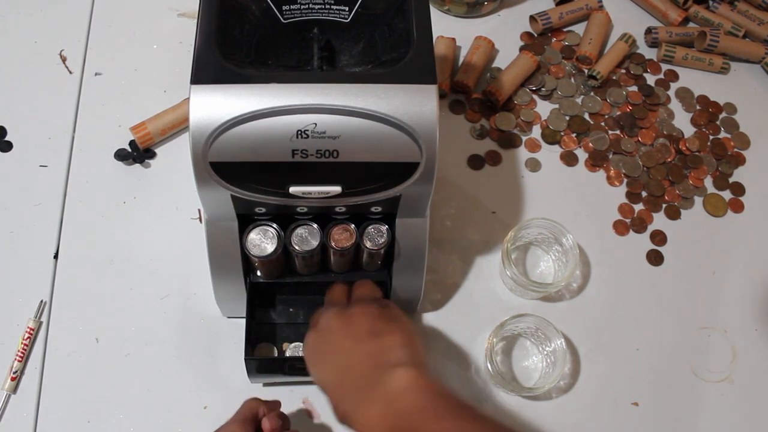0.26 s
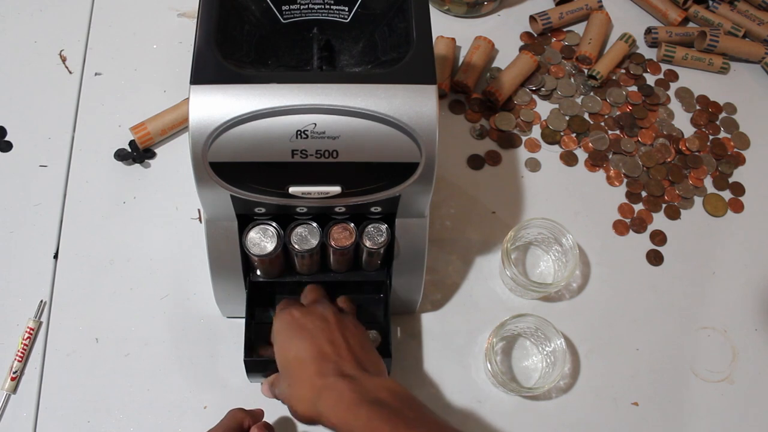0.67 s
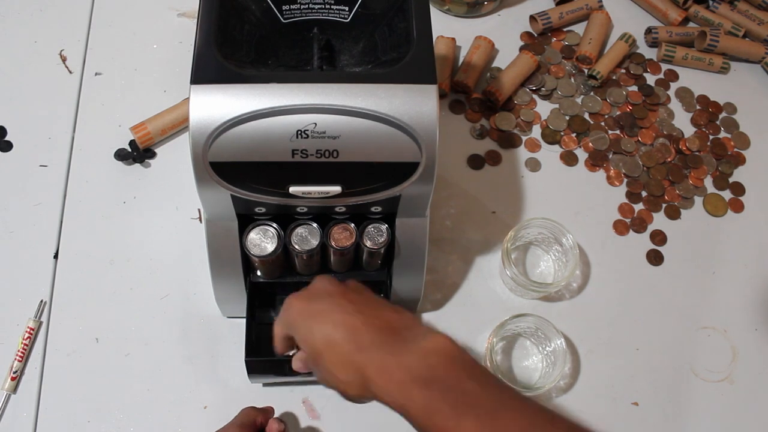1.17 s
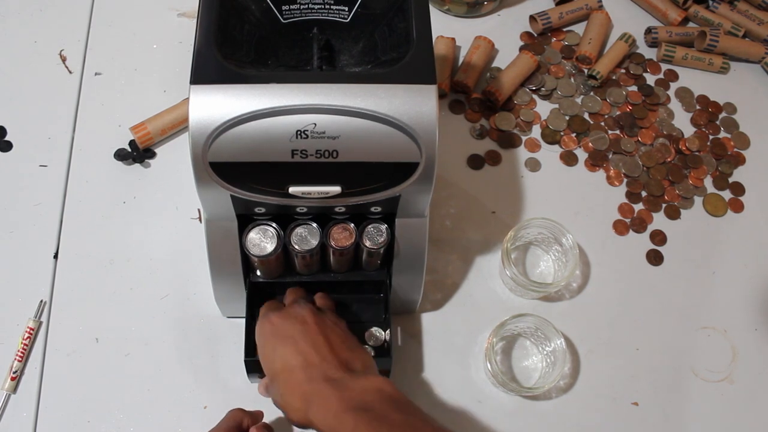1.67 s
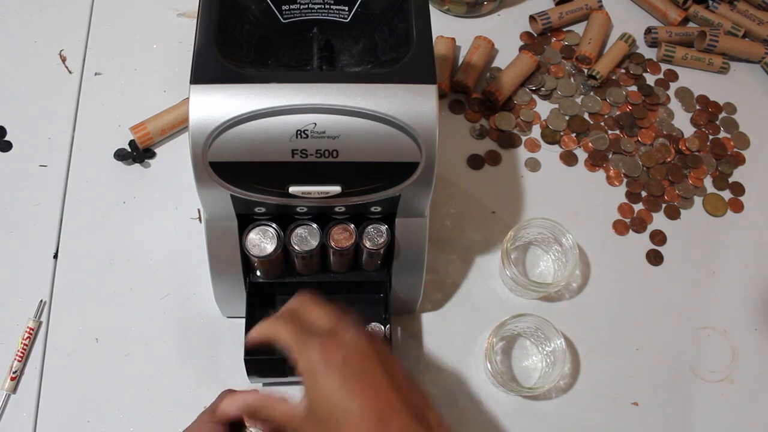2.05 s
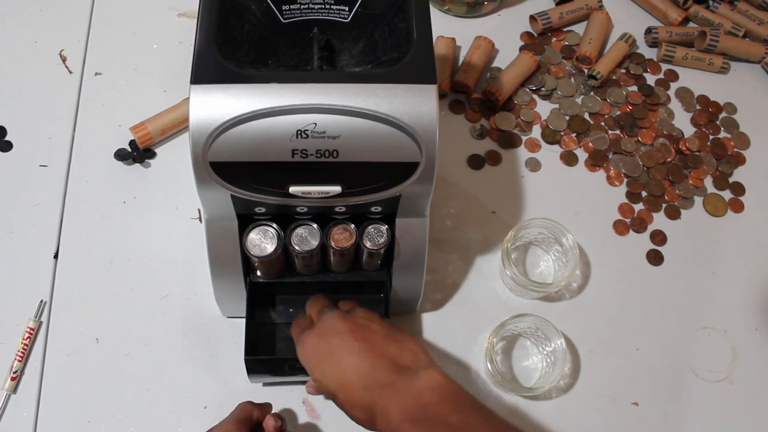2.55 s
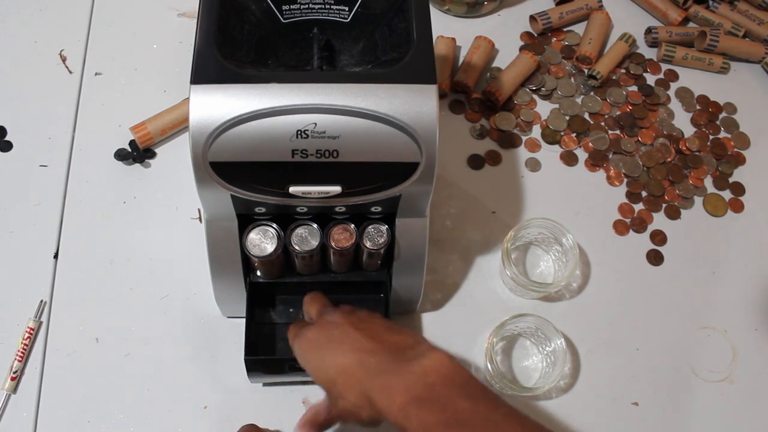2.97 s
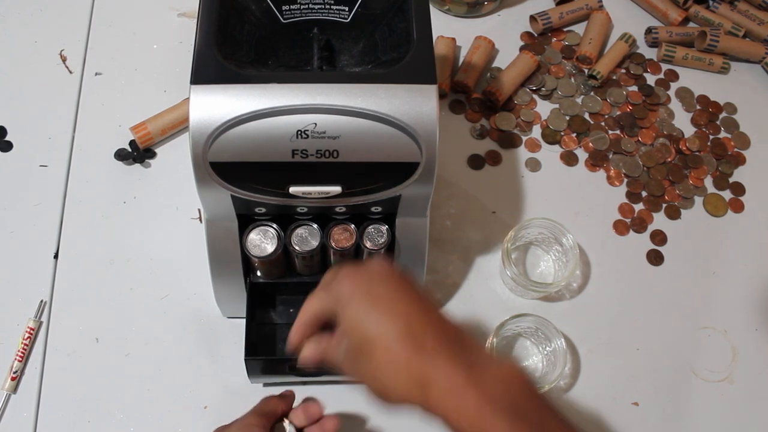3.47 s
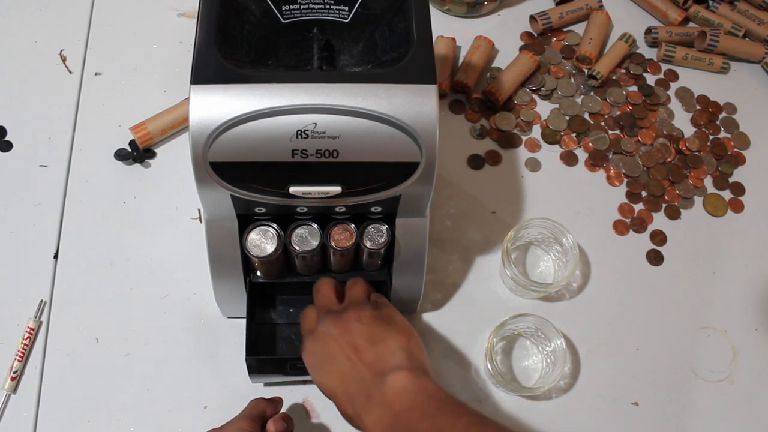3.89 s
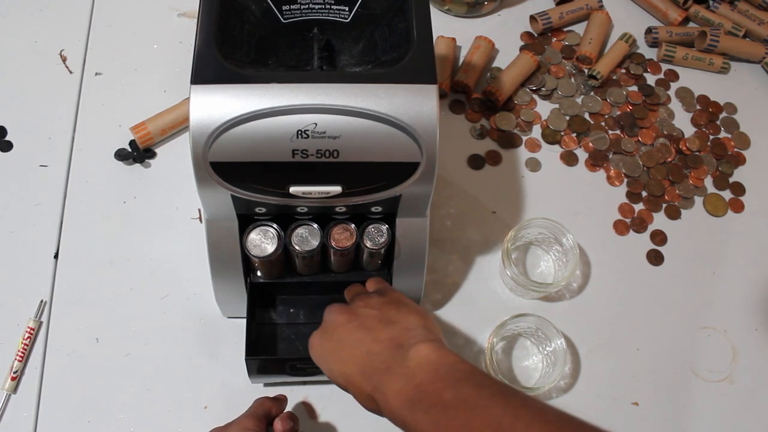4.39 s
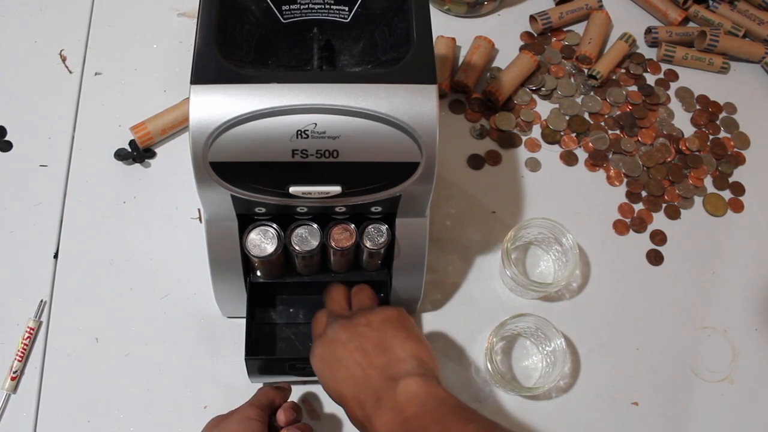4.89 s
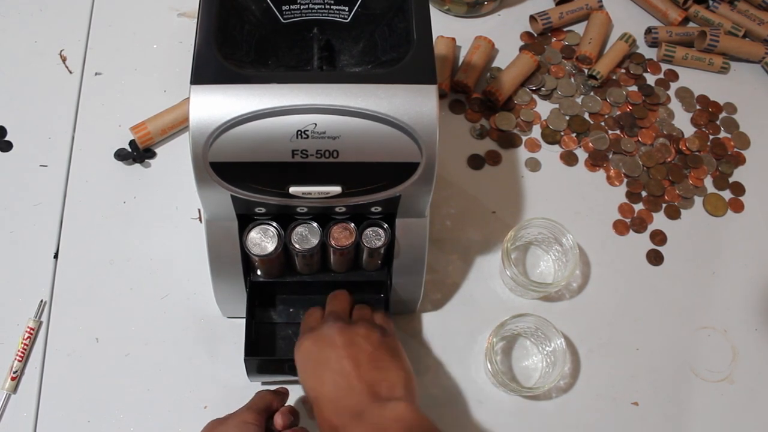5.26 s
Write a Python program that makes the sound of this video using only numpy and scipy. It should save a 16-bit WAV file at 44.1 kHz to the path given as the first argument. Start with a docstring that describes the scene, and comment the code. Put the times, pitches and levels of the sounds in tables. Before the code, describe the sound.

Close, dry rattling of coins being scooped from a plastic tray: irregular scrapes, hard knocks, dull thuds and a few piercing metallic clinks.

```python
"""Fingers scrape coins along a small plastic tray over faint room noise, then a loud clink and knocks break in.
A hand scoops up loose coins: each touch is a noise-like swarm of contacts that excites the modes of the tray,
ticks in the treble and thuds through the table. Coins dropped into the other palm clink: a crack sets narrow
modes ringing, which skin or another coin damps. Soft low bumps and a weak, dull echo complete the scene."""
import sys
import numpy as np
from scipy import signal
from scipy.fft import rfft, irfft
from scipy.io import wavfile
from scipy.ndimage import uniform_filter1d

SR = 44100
rng = np.random.default_rng(int(sys.argv[2]) if len(sys.argv) > 2 else 0)


def transcribe(u):
    """Save the signal u as a 16-bit wav file named by the first command-line argument.

    u: samples, shape (n,) or (channels, n), limited to [-1, 1]; the rate is SR.
    q: integer samples, one column per channel.
    """
    v = np.clip(np.atleast_2d(u).T, -1, 1)
    q = np.round(v * 32767).astype(np.int16)
    wavfile.write(sys.argv[1], SR, q)


N = 243873  # length of the scene [samples]
GRAIN, LEAD = 16384, 6144  # length of one event and position of its peak [samples]
EVENT_MS = (np.arange(GRAIN) - LEAD) * 1000 / SR  # time from the peak
EVENT_HZ = np.fft.rfftfreq(GRAIN, 1 / SR)

# sets of three coin modes, one row per way of ringing; some rows share a coin:
# (mode 1 [Hz], mode 2 [Hz], mode 3 [Hz])
COIN_MODES = [(9405, 13270, 15200), (11265, 11828, 15190), (9310, 12330, 13920), (9500, 11330, 13240),
              (8807, 12750, 14850), (9400, 11850, 15570), (9405, 13270, 15190), (9500, 12770, 13900)]
COIN_WIDTH_HZ = 38  # half-power bandwidth of a freely ringing coin


def undb(db):
    """Decibel law: amplitude ratio of a level in dB."""
    return 10 ** (np.asarray(db) / 20)


def resonance(f, hz, width_hz):
    """Damped oscillator: response of one mode, gain 1 at its centre."""
    return 1j * f * width_hz / (hz ** 2 - f ** 2 + 1j * f * width_hz)


def through(x, response):
    """Linear filtering: multiply the spectrum of each row by its frequency response."""
    return irfft(rfft(x) * response, x.shape[-1])


def root_energy(rows):
    """Signal energy: square root of the summed squares of each row."""
    return np.sqrt((rows ** 2).sum(axis=-1, keepdims=True))


def fits(shape):
    """Intermittency: random levels held a few milliseconds, with softened steps."""
    hold = SR // 300
    levels = rng.standard_normal((shape[0], shape[1] // hold + 1))
    held = np.repeat(levels, hold, axis=1)[:, :shape[1]]
    return uniform_filter1d(held, hold // 2, axis=1)


def contacts(shape, spread_db, fits_db):
    """Random excitation: swarms of tiny uneven contacts that come in fits, with scattered hard clicks."""
    lone = rng.random(shape) < 250 / SR  # 250 a second on average
    level_db = spread_db * rng.exponential(size=shape) + fits_db * fits(shape) + 10.5 * lone
    return rng.standard_normal(shape) * undb(level_db)


def envelope(swell_ms, fade_ms):
    """Exponential growth and decay: one row per event, peaking at LEAD."""
    constant_ms = np.where(EVENT_MS < 0, swell_ms[:, None], fade_ms[:, None])
    return np.exp(-np.abs(EVENT_MS) / np.clip(constant_ms, .05, 45))


def place(times, rows):
    """Superposition: add each row to the time line with its LEAD sample at the given time [s]."""
    out = np.zeros(N + 2 * GRAIN)
    for s, row in zip(times, rows):
        start = int(s * SR) + GRAIN - LEAD
        out[start:start + GRAIN] += row
    return out[GRAIN:GRAIN + N]


def room():
    """Stationary coloured noise: the faint noise of the room and the microphone."""
    # noise spectrum: (frequency [Hz], relative level per hertz [dB])
    noise_spectrum = [(40, -8.5), (200, -4), (1000, -3.5), (5000, -10.5), (16000, -24)]
    hz, db = np.transpose(noise_spectrum)
    f = np.fft.rfftfreq(N, 1 / SR)
    spectrum_db = np.interp(np.log(f + 1), np.log(hz), db)
    noise = through(rng.standard_normal(N), undb(spectrum_db))
    return undb(-54.5) * noise / noise.std()


def reverberation(dry):
    """Diffuse decay: table and walls answer with dull noise that falls 60 dB in 0.14 s."""
    t = np.arange(SR // 4) / SR
    dull_noise = uniform_filter1d(rng.standard_normal(len(t)), size=4)
    echo = dull_noise * undb(-42.0 - 60 * t / 0.14)
    return signal.fftconvolve(dry, echo)[:N]


def bumps():
    """Transient low oscillation: the heel of the hand or the tray pushes the table for a few soft cycles."""
    # soft bumps: (start [s], peak level before smoothing [dB], pitch [Hz])
    table_bumps = [(0.329, -37, 197), (0.519, -39, 147), (1.149, -33, 161), (1.462, -35, 145),
                   (1.646, -31, 210), (1.676, -30.5, 134), (1.768, -34, 176), (2.292, -34.5, 272),
                   (2.93, -31, 134), (3.661, -26.5, 230), (4.687, -26, 165), (4.95, -32, 155),
                   (5.092, -32, 280), (5.296, -36, 152)]
    swell_ms, fade_ms = 2.77, 11.6  # before smoothing
    s, db, hz = np.transpose(table_bumps)
    phase = rng.random((len(s), 1))  # in cycles
    cycles = np.sin(2 * np.pi * (hz[:, None] * EVENT_MS / 1000 + phase))
    shape = uniform_filter1d(envelope(swell_ms + 0 * s, fade_ms + 0 * s), size=200, axis=1)
    return place(s + swell_ms / 1000, undb(db)[:, None] * shape * cycles)


def handful(gain_db):
    """Modal superposition: all coin modes, each damped by neighbours; one row of gains [dB] per event."""
    return sum(undb(gain_db[:, k, None]) * resonance(EVENT_HZ, hz, 4 * COIN_WIDTH_HZ)
               for k, hz in enumerate(np.ravel(COIN_MODES)))


def tray(tilt_db, deep_db):
    """Modal response: the struck spot weights each mode at random; the plastic is dull in the treble."""
    # tray modes: (frequency [Hz], bandwidth [Hz], relative level [dB])
    tray_modes = [(854, 130, -8.5), (1077, 100, -5.5), (1259, 176, 3), (1586, 217, 4), (1930, 576, 0),
                  (2428, 326, 1), (2930, 343, -5), (3567, 395, -2), (4670, 2870, -5.5)]
    spot_db = 3.89 * rng.standard_normal((len(tilt_db), len(tray_modes)))
    # a blow that shakes the table also drums the tray floor, its lowest mode
    spot_db[:, 0] = 0.6 * spot_db[:, 0] + deep_db
    modes = 0
    for k, (hz, width_hz, mode_db) in enumerate(tray_modes):
        tilted_db = tilt_db[:, None] * np.log2(hz / 1600)  # the tilt is in dB per octave
        gain = undb(mode_db + spot_db[:, k, None] + tilted_db)
        modes = modes + (-1) ** k * gain * resonance(EVENT_HZ, hz, width_hz)
    return modes / (1 + 1j * EVENT_HZ / 9000) ** 4


def strokes():
    """Contact force: a thud grows with the weight of the hand, with level, length and a soft contact."""
    # coins and nails knock the tray, a sudden start and a fade:
    # (time [s], body level [dB], fade constant [ms], tick level against body [dB])
    knocks = [(0.24, -31, 1.5, 22.5), (0.306, -40, 12, -7), (0.478, -29, 12, -9), (0.51, -21, 22, -13),
              (0.554, -15.5, 5, -6), (0.6638, -28, 32, -13), (0.6675, -11, 2, -7), (0.741, -23, 27, -17),
              (0.796, -25.5, 8.1, -17), (0.8474, -5, 2.7, -12), (0.847, -21.5, 16, -7),
              (0.931, -35, 17, -9), (0.969, -34.5, 10, -13), (1.0109, -14.5, 6.3, -6), (1.053, -32, 8.8, 0),
              (1.14, -22.5, 6, -3), (1.285, -25.5, 20, -26), (1.298, -12.5, 3, -6.5), (1.459, -29, 21, -43),
              (1.516, -3, 4.3, -9), (1.5395, -27, 0.94, -37), (1.65, -29, 4, -16), (1.673, -10, 10, -26.5),
              (1.725, -23.5, 13.6, -31), (1.894, -16, 5.3, -10), (1.9231, -7.5, 4.1, -5.5),
              (2.1675, -8.5, 7.3, -19.5), (2.206, -9, 3.2, -20), (2.2994, -7.5, 5.1, -9.5),
              (2.3085, -12, 2.2, -2), (2.357, -21, 18, -9), (2.506, -8, 1.75, -11),
              (2.566, -11.5, 2.5, -11), (2.568, -19.5, 44, -7), (2.682, -21, 19.5, -8),
              (2.9341, -17, 4.1, -26), (3.069, -19.5, 0.96, -33), (3.125, -31.5, 6.3, -15),
              (3.18, -26, 3.1, -41), (3.277, -7, 1.9, -7.5), (3.3012, -7, 1.5, -6),
              (3.332, -31.5, 7.4, -22), (3.403, -32, 52, -7), (3.6621, -15, 12, -48),
              (3.686, -15, 5.8, -16), (3.701, -21, 7.3, -17), (3.7727, -16.5, 22, -10.5),
              (3.815, -21, 5.6, -14), (3.8539, -15, 8, -21.5), (3.915, -11.5, 8.5, -7.5),
              (3.94, -23.5, 18.6, -45), (4.0866, -21, 4.9, -9.5), (4.155, -9.5, 14.8, -12.5),
              (4.2112, -15.5, 3.4, -2.5), (4.229, -15, 3.3, -9), (4.3311, -25.5, 8.1, -17),
              (4.4196, -14.5, 3.5, 0), (4.4435, -24, 22, -9), (4.671, -17.5, 8.3, -10),
              (4.706, -11.5, 3.7, -25), (4.7292, -19, 10, -19), (4.78, -13, 11.7, -28),
              (4.928, -15, 2.3, -58), (4.945, -10.5, 12.2, -18), (4.979, -10, 4.9, -8.5),
              (5.055, -27.5, 53, -21), (5.088, -22.5, 31, -40.5), (5.127, -15, 22, -14),
              (5.175, -17.5, 10.4, -5), (5.228, -29, 4.3, -36), (5.2846, -17.5, 8.3, -43),
              (5.326, -17, 8.4, -26.5), (5.4242, -11, 2.2, -6.5), (5.454, -16, 3.6, -18)]
    # fingers scrape coins along the tray, building up to a peak; swells over 45 ms are held at 45 ms:
    # (time of the peak [s], body level [dB], swell constant [ms], tick level against body [dB])
    scrapes = [(0.0226, -29, 16, -10.5), (0.0977, -39.5, 16, -13), (0.1456, -21, 5.6, -23.5),
               (0.3367, -26, 7, -22), (0.41, -10, 9.3, -8.5), (0.531, -13.5, 7.6, -13),
               (0.565, -19.5, 15, -7), (0.5925, -21.5, 26, -10), (0.6312, -17, 7.8, -10.5),
               (0.697, -18.5, 6.1, -12), (0.8736, -15, 6.5, -12.5), (0.9942, -25, 15, -26),
               (1.0645, -22.5, 5.5, -17), (1.104, -30.5, 27, -11.5), (1.1526, -15.5, 5.2, -13),
               (1.224, -24.5, 21, -6), (1.2434, -18.5, 3, -2), (1.563, -25.5, 23.4, -31),
               (1.576, -25.5, 4.9, -12), (1.6942, -24.5, 33, -33.5), (1.813, -20, 13, -13),
               (1.8281, -10, 5.9, -7.5), (2.011, -35, 13.6, -21), (2.3311, -24.5, 23.6, -10.5),
               (2.4074, -19.5, 8.7, -7), (2.46, -38, 31, -14), (2.472, -14.5, 2.3, -61),
               (2.5812, -11, 4.9, -7), (2.7046, -9.5, 3.8, -2), (2.669, -29, 27, -24),
               (2.7643, -29, 3, -10), (2.9927, -11.5, 2.76, -39), (3.01, -27.5, 21, -9.5),
               (3.092, -18, 7.2, -15), (3.203, -27.5, 16, -37.5), (3.2969, -15, 6.4, -6.5),
               (3.414, -12.5, 8.3, -12.5), (3.4948, -24, 7.6, -15), (3.6777, -10.5, 5.7, -12.5),
               (3.766, -26.5, 5.3, -13), (3.7794, -12, 5.6, -14), (3.8034, -22.5, 7.8, -3.5),
               (4.0075, -21.5, 8.3, -5), (4.2883, -40.5, 16, -26), (4.3592, -15.5, 3.4, -14.5),
               (4.4098, -11, 2.45, -20), (4.4184, -23, 11.3, -11), (4.536, -41, 9.1, -5),
               (4.6917, -11, 3.2, -20.5), (4.7056, -27, 14.6, -15), (4.7518, -20.5, 3.4, -36),
               (4.7983, -14.5, 6.8, -20), (4.84, -39.5, 60, -19), (4.9615, -36.5, 93, -11),
               (5.022, -20, 5.7, -17), (5.1429, -5, 1.4, -28), (5.264, -28, 4.5, -5),
               (5.3022, -20.5, 14, -16), (5.3815, -28.5, 9.1, -20)]
    # how heavily the hand leans on the tray: (time [s], thud level before adjustment [dB])
    hand_weight = [(0.0, -44.5), (0.33, -26.5), (0.98, -43.5), (1.14, -25), (1.4, -50), (1.52, -24),
                   (1.6, -49), (1.75, -29.5), (2.06, -66), (2.17, -25), (2.3, -32), (2.9, -44),
                   (2.94, -17.5), (3.05, -42), (3.6, -21.5), (3.67, -30), (3.73, -35.5), (4.6, -35),
                   (4.7, -24), (4.74, -38), (5.1, -29.5), (5.53, -40)]
    knock_s, knock_db, knock_fade_ms, knock_tick_db = np.transpose(knocks)
    scrape_s, scrape_db, scrape_swell_ms, scrape_tick_db = np.transpose(scrapes)
    s, db = np.r_[knock_s, scrape_s], np.r_[knock_db, scrape_db]
    tick_db = np.r_[knock_tick_db, scrape_tick_db]
    swell_ms = np.r_[0.45 + 0 * knock_fade_ms, scrape_swell_ms]
    fade_ms = np.r_[knock_fade_ms, 0.83 * scrape_swell_ms]
    thud_level_db = np.interp(s, *np.transpose(hand_weight))
    thud_level_db += 0.37 * (db + 18.0) - 0.34 * (tick_db + 35.5)
    thud_level_db += np.log2((swell_ms + fade_ms) / 10)  # 1 dB per doubling of length
    return s, db, swell_ms, fade_ms, tick_db, thud_level_db - db


def touches():
    """Forced modal vibration: each touch rings the tray at two spots, ticks and thuds through the table."""
    # bands in which hard contacts tick: (centre [Hz], width of one filter stage [Hz], relative level [dB])
    tick_bands = [(4834, 3030, 6.5), (7280, 2920, 3), (9840, 2030, 1), (12930, 7100, -8.5)]
    # the fingers come down flat on the tray floor and drum it for a moment: (time [s])
    landings = [1.516, 2.167, 3.677]
    landing_db, landing_s = 12.5, 0.0068  # boost of the lowest mode and its spread in time
    s, db, swell_ms, fade_ms, tick_db, thud_db = strokes()
    shape = envelope(swell_ms, fade_ms)
    here, there = (shape * contacts(shape.shape, spread_db=2.6, fits_db=2.9) for _ in range(2))
    # the main contact lands at the peak
    here[:, LEAD] += 14.0

    # a soft fingertip (little tick) favours the low modes
    tilt_db = 0.32 * (tick_db + 14.0)
    nearness = np.exp(-((s[:, None] - landings) / landing_s) ** 2).sum(axis=1)
    deep_db = 0.47 * (db + thud_db + 37.5) + landing_db * nearness
    body = through(here, tray(tilt_db, deep_db)) + through(there, tray(tilt_db, deep_db))

    # coins that are pushed along ring briefly
    pushed = handful(0.95 * rng.standard_normal((len(s), np.size(COIN_MODES))) - 12)
    # hard contacts crowd round the peak, and each band comes in its own flecks
    hard = (here + there) * shape ** 0.25
    tick = 0
    for hz, width_hz, band_db in tick_bands:
        flecks = hard * undb(band_db + 3 * fits(shape.shape))
        tick = tick + through(flecks, resonance(EVENT_HZ, hz, width_hz) ** 2 * (1 + pushed))

    table = resonance(EVENT_HZ, 116.5, 110) * resonance(EVENT_HZ, 365, 370)
    thud = through(here + there, table + 0.3 * resonance(EVENT_HZ, 515, 450))

    # give every part the energy of the envelope before setting its level
    body, tick, thud = (part * root_energy(shape) / root_energy(part) for part in (body, tick, thud))
    touch = body + undb(tick_db)[:, None] * tick + undb(thud_db)[:, None] * thud
    return place(s, undb(db)[:, None] * touch)


def clinks():
    """Impact and free vibration: a bright crack starts a coin ringing until skin or another coin stops it."""
    # coin on coin:
    # (time [s], peak level [dB], ring against crack [dB], crack fade constant [ms], free ringing [ms])
    coin_hits = [(0.241, 9, -17, 3.5, 13), (0.547, -23, 2, 7.2, 31), (0.5844, -30, 3, 4, 25),
                 (0.603, -22, 0, 12, 22), (0.6965, -37, -3, 1.5, 16), (0.7662, -25.5, -3, 4.5, 10),
                 (1.3808, -9.5, -8, 1.2, 14), (1.3888, -8.5, -4, 3.5, 25), (1.664, -17, -21, 5.2, 56),
                 (2.0467, -28.5, -18, 11, 54), (2.0734, -15, -8, 3, 58), (2.1083, -5, -25, 1.16, 13),
                 (2.112, -16.5, -9, 2.7, 15), (2.8443, -3, -12, 3.2, 5.8), (2.8502, -11.5, -9, 2.2, 18),
                 (3.5719, -11.5, -2, 2.5, 7.6), (3.573, 3.5, -1.5, 3, 7.3), (3.581, -2.5, -12, 5.2, 30),
                 (3.603, -14, -16, 13, 15), (4.6079, 3, -5, 4.5, 17), (4.6194, -15, -13, 2, 7.1),
                 (4.637, -14.5, -28, 3.6, 46), (4.642, -30, 8, 1.4, 6)]
    # which set of coin modes rings at each clink: (row of COIN_MODES)
    ringing_set = [5, 4, 4, 1, 4, 4, 1, 1, 4, 1, 2, 2, 2, 3, 3, 0, 0, 6, 0, 4, 4, 4, 7]
    # relative strength of the modes in each set: (mode 1 [dB], mode 2 [dB], mode 3 [dB])
    mode_strength = [(-3, -24, -4.5), (-1, 2, 3), (-13, 14, -8), (-14, -27, 23), (-16, -23, 9),
                     (-26, -26.5, -10.5), (-17.5, -7, -13.5), (-19, 3, -10)]
    s, db, ring_db, crack_ms, free_ms = np.transpose(coin_hits)
    # the crack is followed by a fading chatter of neighbours
    shape = envelope(0 * s, crack_ms) + undb(-5.5) * envelope(0 * s, 0.52 * free_ms)
    blow = shape * contacts(shape.shape, spread_db=5.0, fits_db=-4.0)
    blow[:, LEAD] += 5.0

    # all modes of the handful answer a little
    others = handful(2.2 * rng.standard_normal((len(s), np.size(COIN_MODES))))
    bright = resonance(EVENT_HZ, 11400, 24000) * resonance(EVENT_HZ, 6300, 14000) ** 2
    crack = through(blow, bright * (1 + 0.7 * others))

    # the first contact sets the coin ringing, later ones only nudge it
    first = 0.47 * blow
    first[:, LEAD] += 12.0
    hz, gain = np.array(COIN_MODES)[ringing_set], undb(mode_strength)[ringing_set]
    modes = gain[..., None] * resonance(EVENT_HZ, hz[..., None], COIN_WIDTH_HZ)
    ring = through(first, modes.sum(axis=1))
    # once stopped, the ring dies with a 2.9 ms time constant on top of its own decay
    ring = ring * np.exp(-np.clip(EVENT_MS - free_ms[:, None], 0, None) / 2.9)

    crack, ring = (part / np.abs(part).max(axis=1, keepdims=True) for part in (crack, ring))
    clink = crack + undb(ring_db)[:, None] * ring
    return place(s, undb(db)[:, None] * clink / np.abs(clink).max(axis=1, keepdims=True))


def scene():
    """Superposition: all sources, their echo and the room noise, the same in both channels."""
    dry = touches() + clinks() + bumps()
    mono = dry + reverberation(dry) + room()
    return np.array([mono, mono])


def record(dry):
    """Overload and band limiting: the recorder clips peaks beyond full scale and cuts the top."""
    clipped = np.clip(dry, -1, 1)
    roll_off = signal.cheby1(6, 1, 15200, fs=SR, output="sos")  # edge in Hz
    top_cut = signal.ellip(10, .2, 70, 16800, fs=SR, output="sos")  # edge in Hz
    return signal.sosfilt(top_cut, signal.sosfilt(roll_off, clipped))


dry = scene()
out = record(dry)
transcribe(out)
```